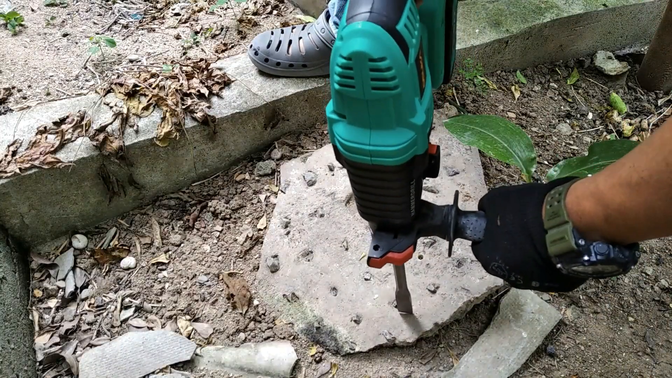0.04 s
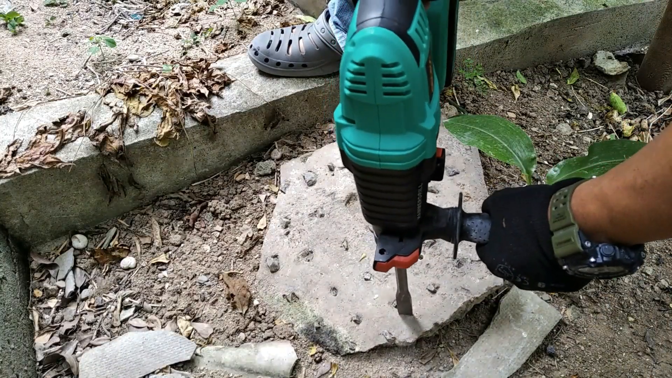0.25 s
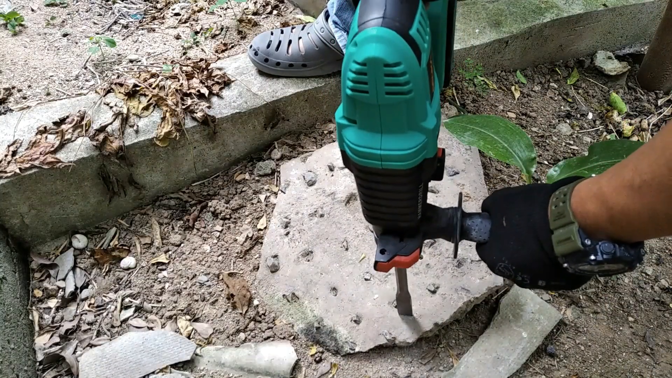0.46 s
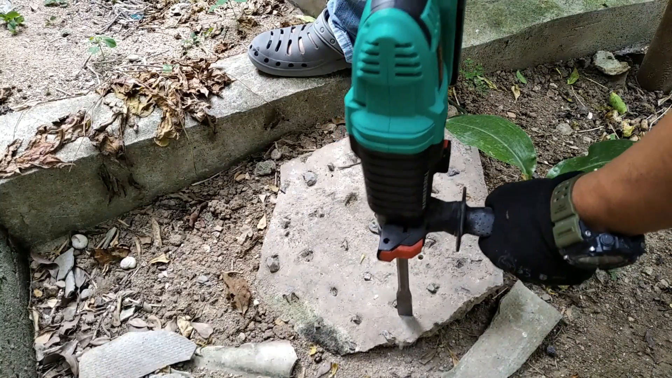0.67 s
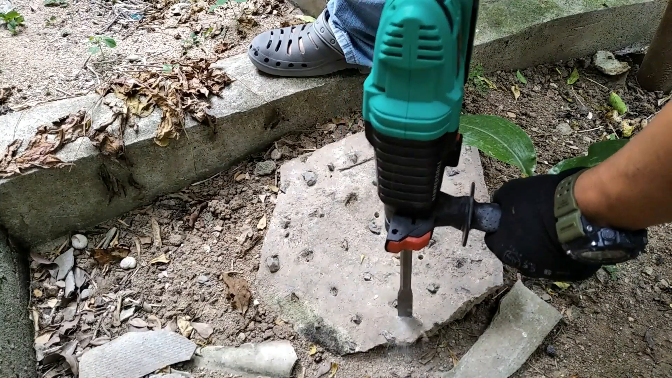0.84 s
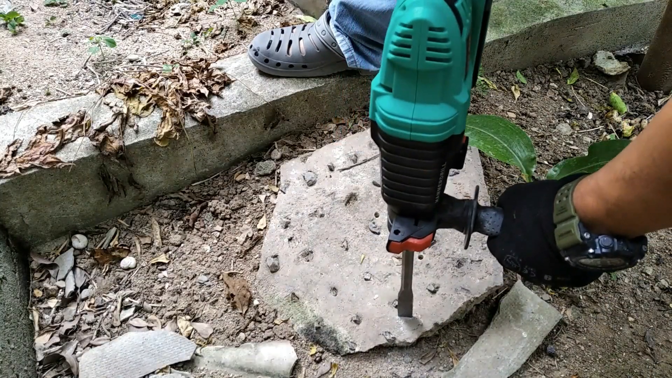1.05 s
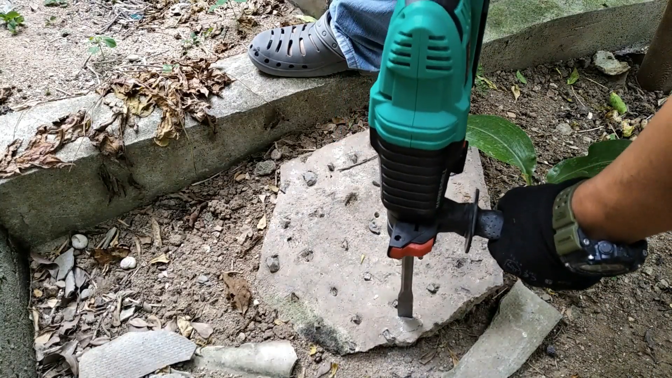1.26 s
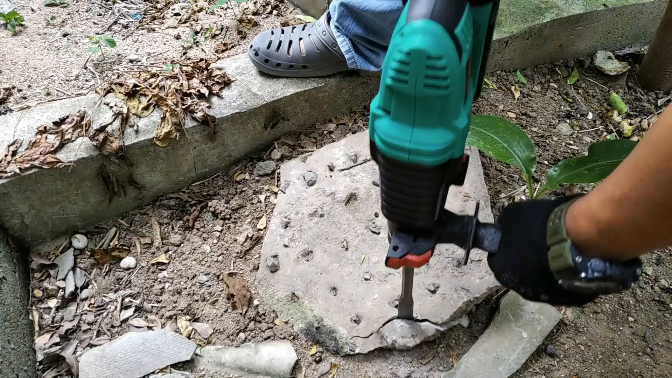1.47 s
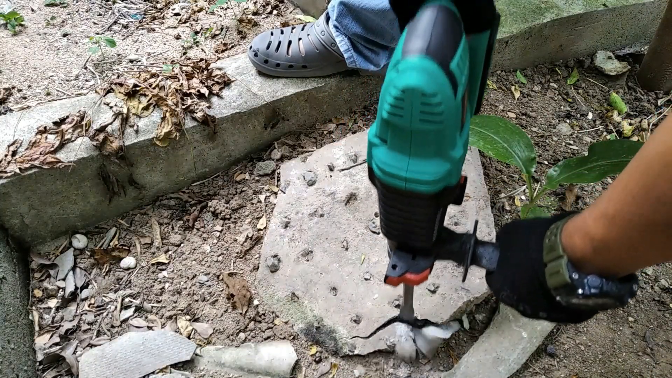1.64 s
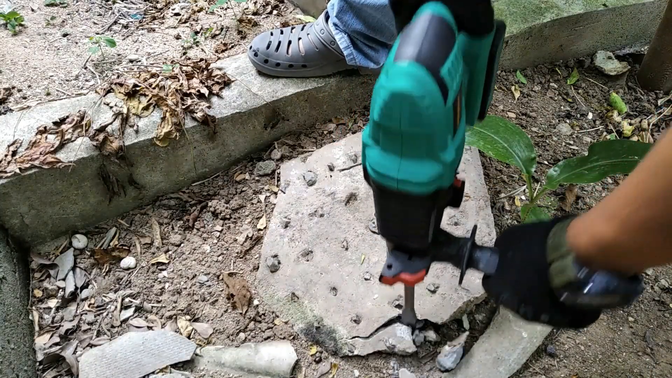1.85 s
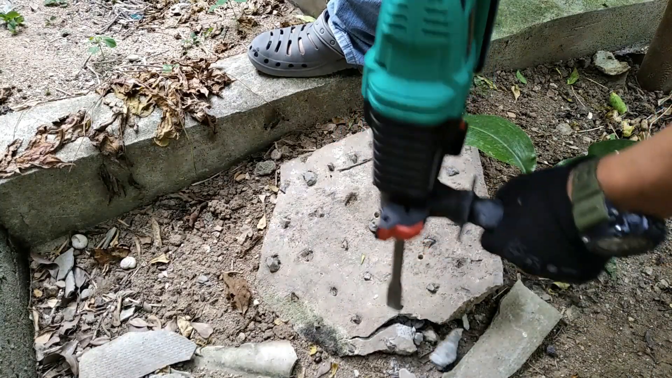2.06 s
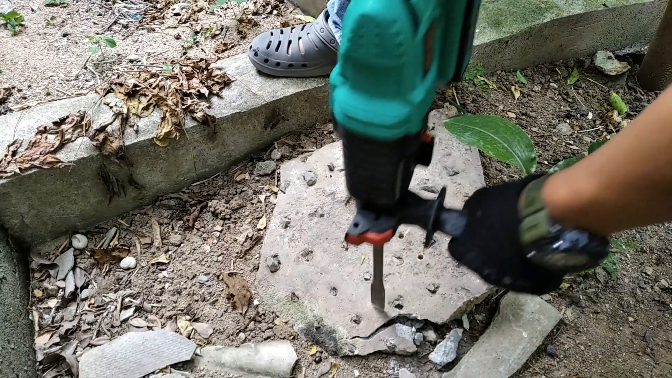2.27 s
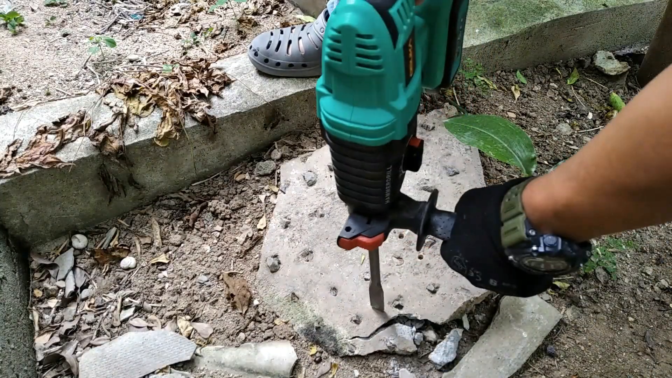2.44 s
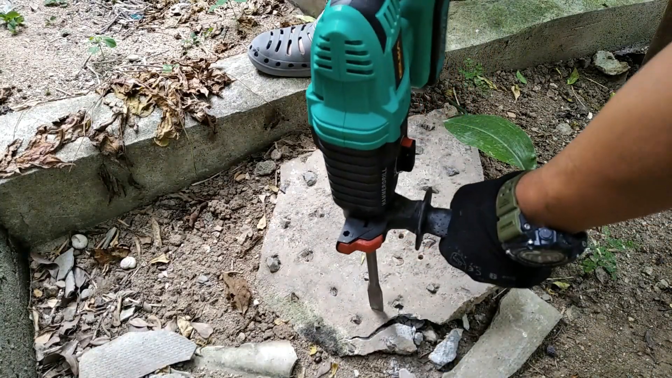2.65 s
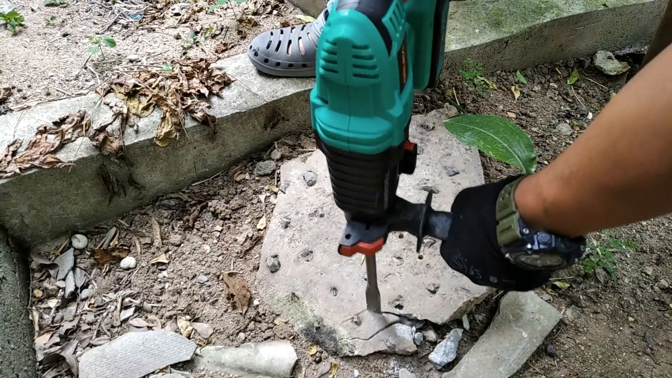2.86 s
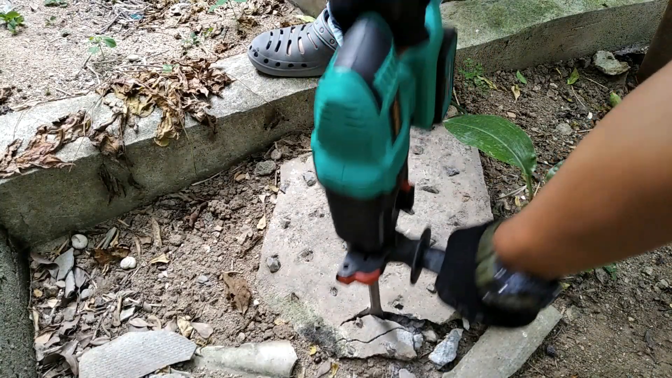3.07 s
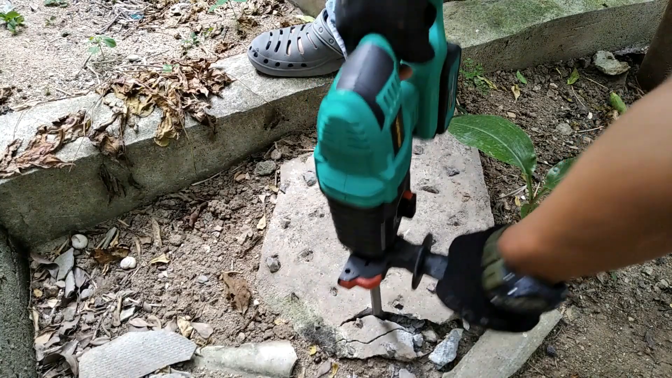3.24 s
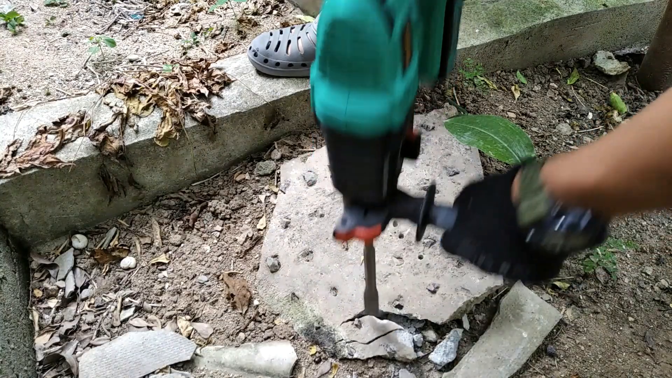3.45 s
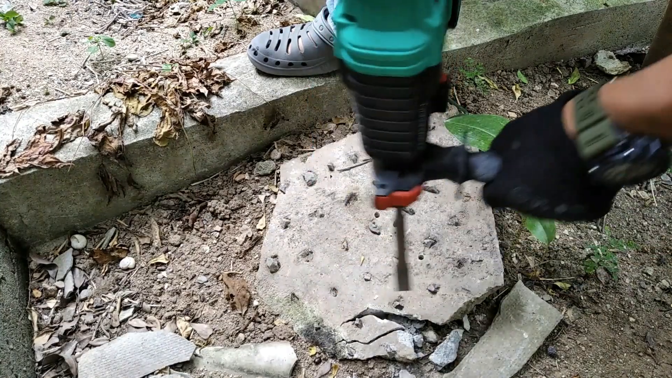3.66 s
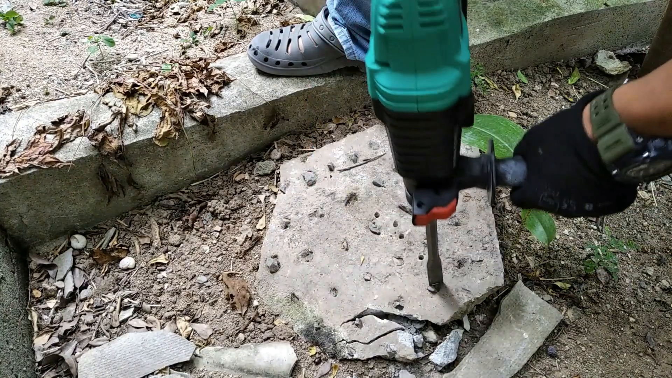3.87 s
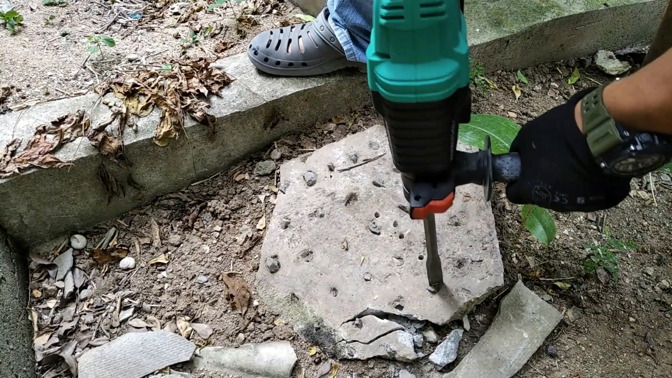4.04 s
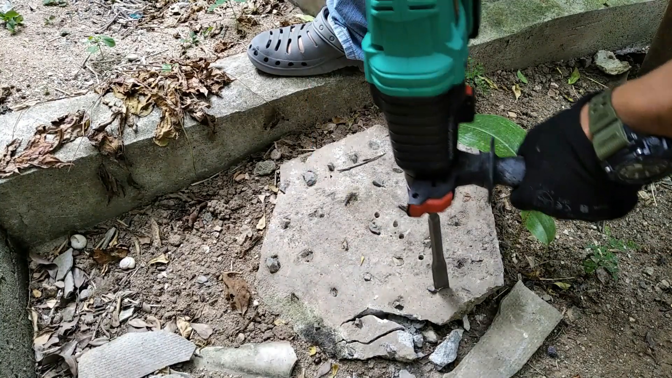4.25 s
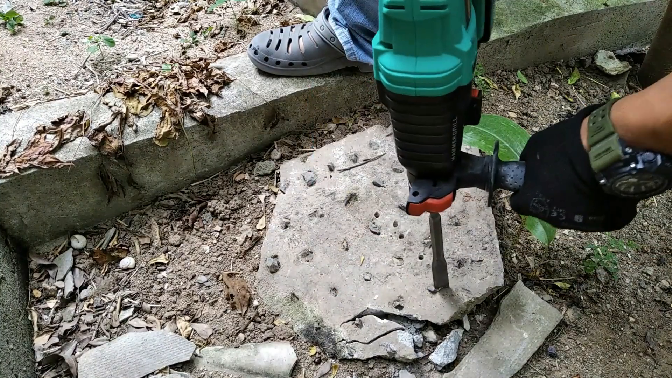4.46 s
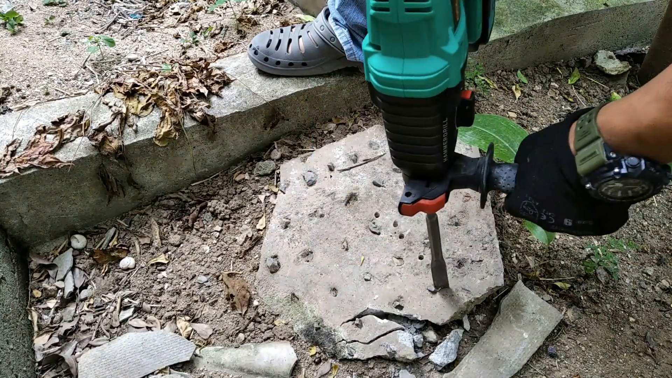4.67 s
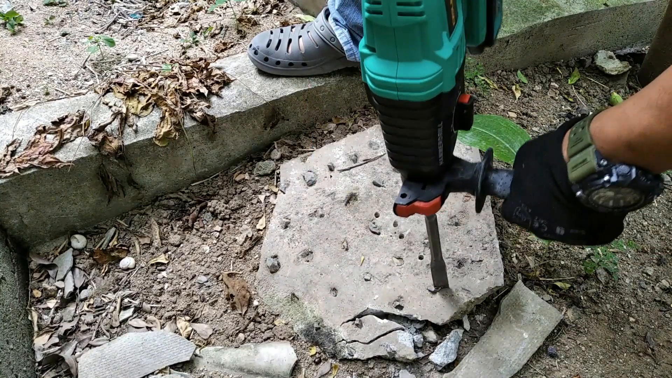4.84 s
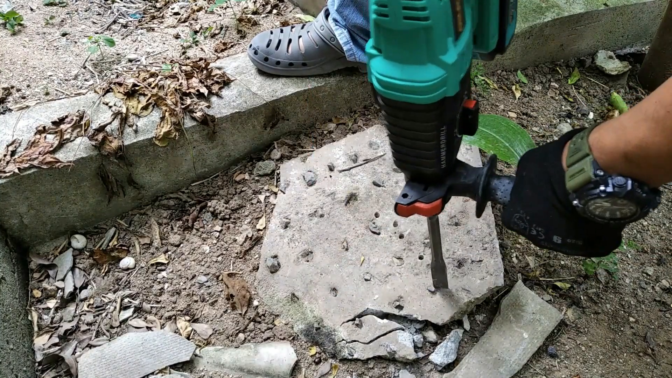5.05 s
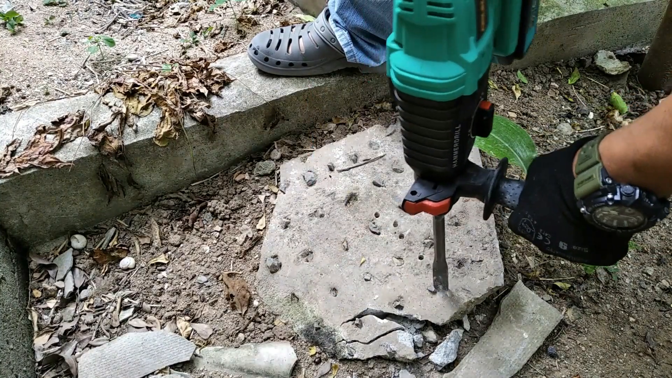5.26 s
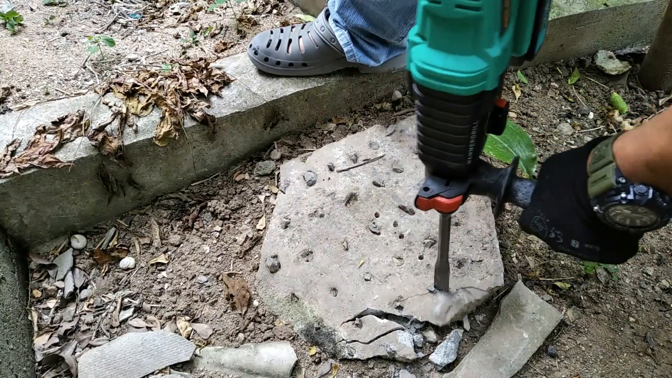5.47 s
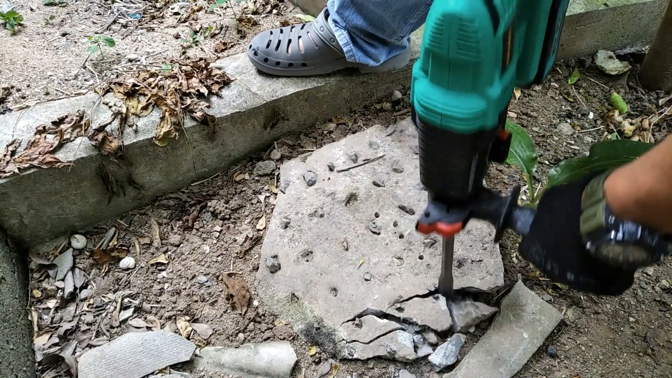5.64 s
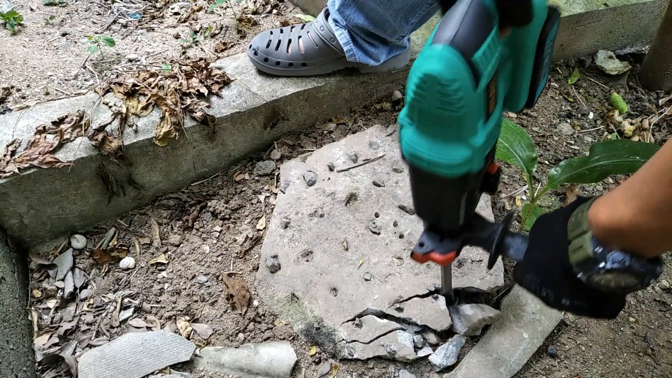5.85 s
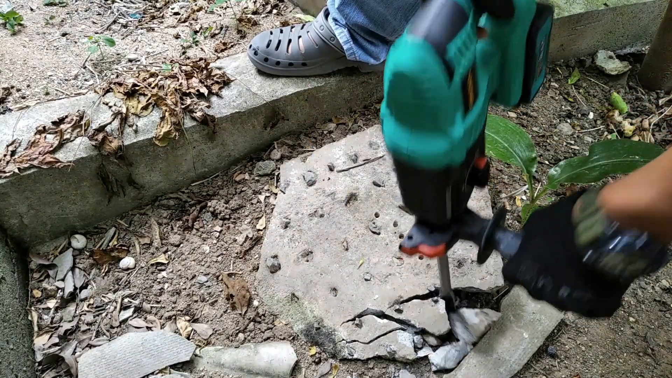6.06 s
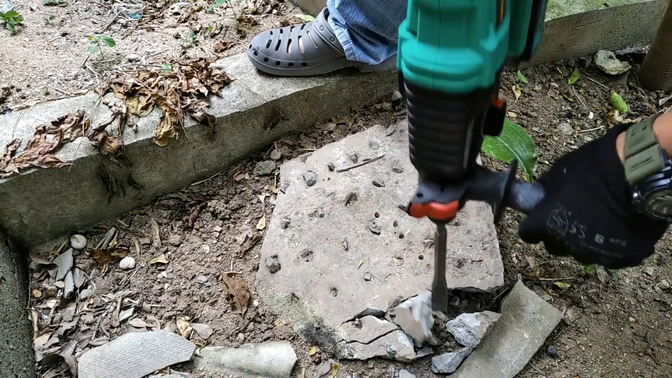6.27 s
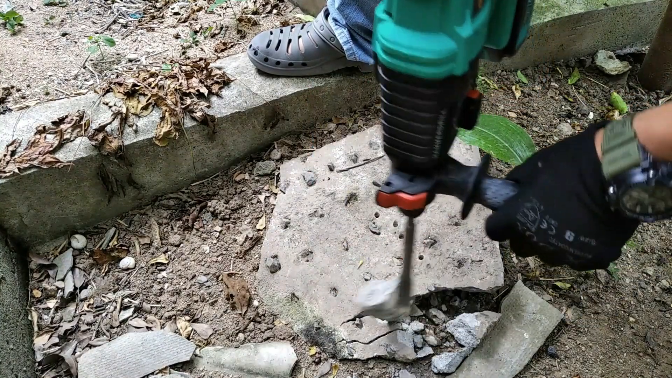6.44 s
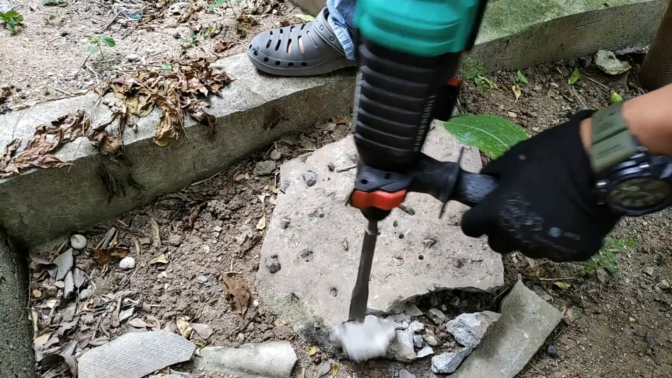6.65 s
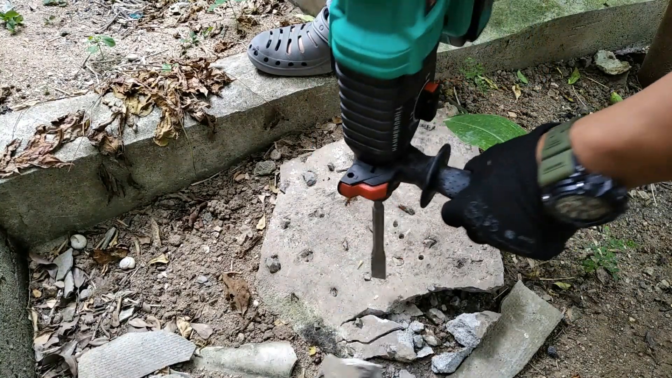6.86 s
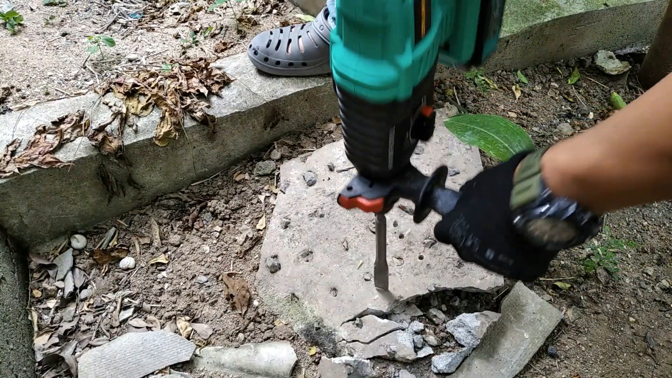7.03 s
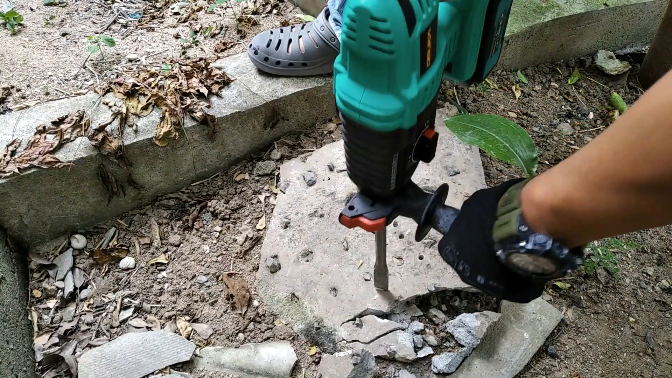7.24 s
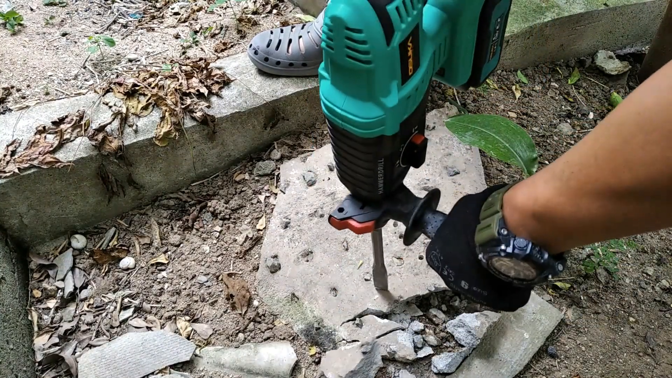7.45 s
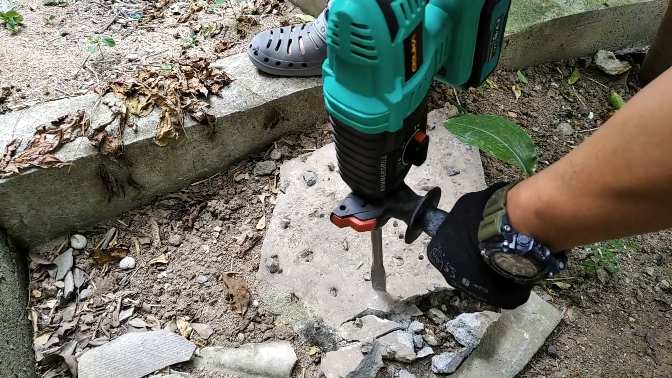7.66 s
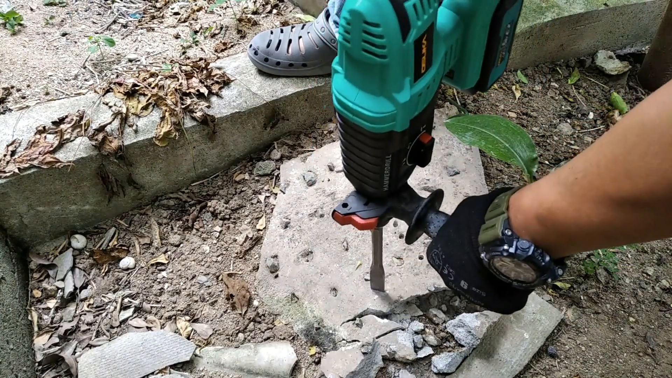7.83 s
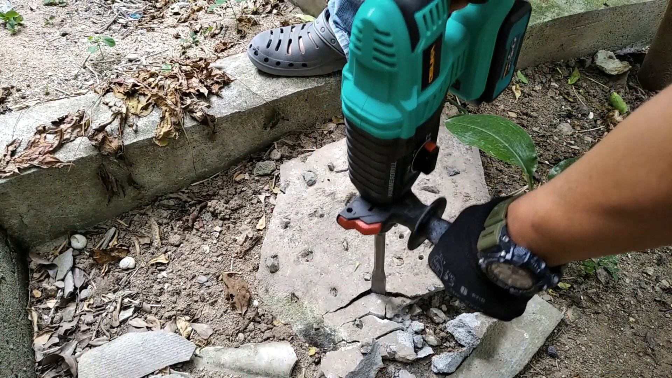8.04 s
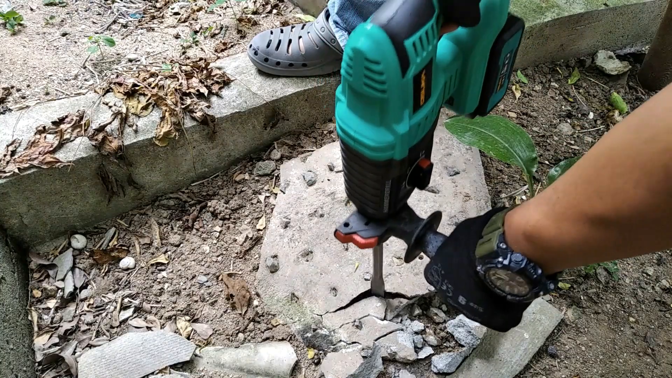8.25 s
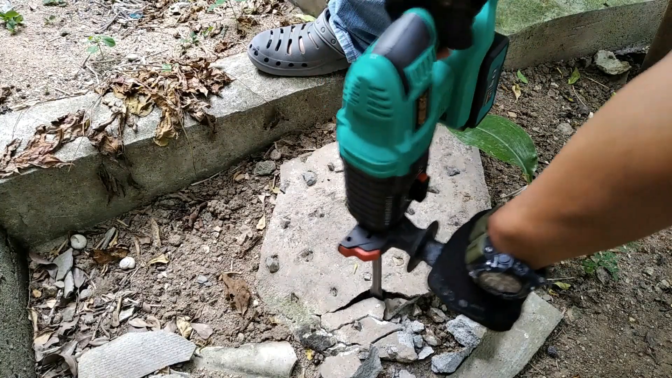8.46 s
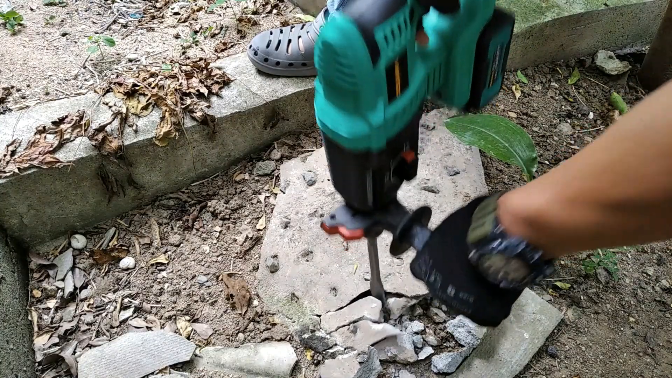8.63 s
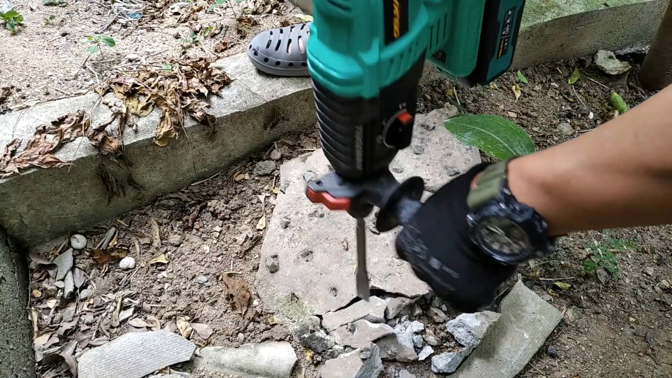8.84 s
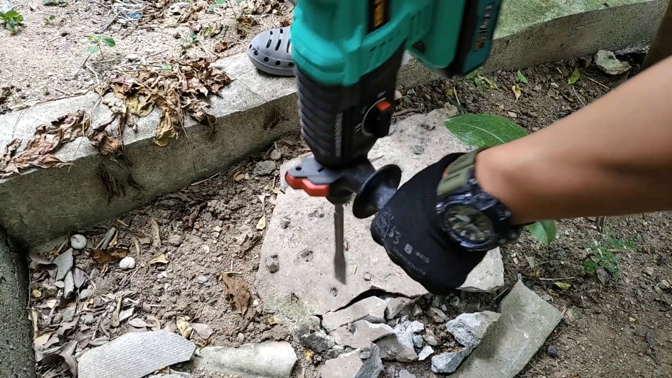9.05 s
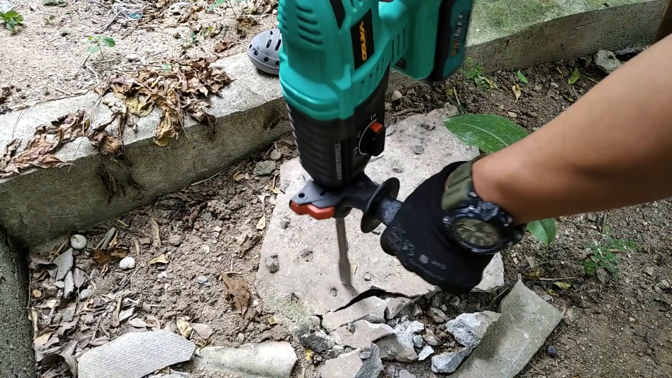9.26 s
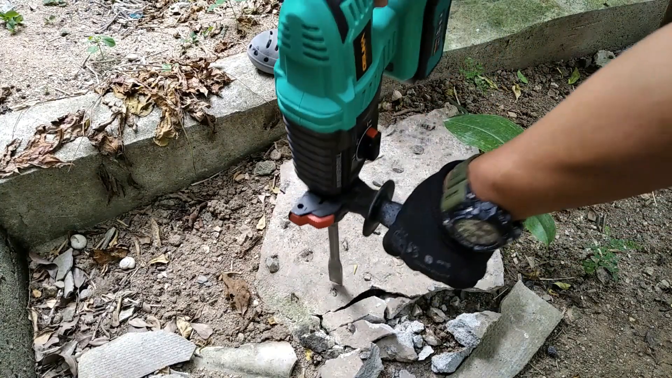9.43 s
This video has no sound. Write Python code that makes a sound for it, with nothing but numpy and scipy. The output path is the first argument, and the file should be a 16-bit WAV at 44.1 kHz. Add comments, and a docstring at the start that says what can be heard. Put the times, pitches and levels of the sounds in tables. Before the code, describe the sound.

A quiet outdoor floor, then a switch click at 0.07 s. A cordless rotary hammer spins up, its blows on concrete quickening from a separate knocking to a dense rattle by 1 s. It sags to slow beats around 1.2 s, revs again to full speed near 1.6 s, and winds down by 2.4 s with ringing chisel clangs. Stony knocks and a scrape follow at 2.5 s. The second burst, 2.7 to 3.9 s, is rough, with hard metallic clangs around 3.2 s. Knocks and light scraping fill 3.8 to 4.5 s. The third burst, 4.7 to 6.4 s, runs fast, gritty and bright, with gear grind, fan hiss and whine. Rubble ticks and knocks scatter until 7.5 s. The fourth burst, 7.55 to 9.2 s, hammers steadily, slows and stops; a few small knocks end it near 9.4 s. Close, dry, wide stereo.

```python
"""Outdoors in a quiet garden: a cordless rotary hammer chisels a concrete slab in four bursts,
heard by a close pair of microphone ports.
A crank drives one blow a turn: the steel chisel cracks and rings, the slab answers in damped modes.
Gears grind and loose parts rattle as shaped noise, the fan hisses, the motor whines in gliding tones.
Between bursts the chisel knocks and scrapes on rubble over the garden floor and faint far tones."""
import sys
import numpy as np
from scipy import signal
from scipy.fft import rfft, irfft
from scipy.io import wavfile
from scipy.ndimage import uniform_filter1d

SR = 44100
rng = np.random.default_rng(int(sys.argv[2]) if len(sys.argv) > 2 else 0)


def transcribe(u):
    """Save the signal u as a 16-bit wav file named by the first command-line argument.

    u: samples, shape (n,) or (channels, n), limited to [-1, 1]; the rate is SR.
    q: integer samples, one column per channel.
    """
    v = np.clip(np.atleast_2d(u).T, -1, 1)
    q = np.round(v * 32767).astype(np.int16)
    wavfile.write(sys.argv[1], SR, q)


N = 418950
HZ = np.maximum(np.arange(N // 2 + 1) * SR / N, 1)      # frequency of every bin

# crank speed, one table a burst from the trigger on: t/s, speed/blows per s
CRANK_SPEED = [
    [(0.068, 0.0), (0.085, 13), (0.19, 18), (0.27, 26.5), (0.335, 34.08), (0.79, 33.96), (0.86, 40.03),
     (0.95, 53.1), (1.04, 58.34), (1.11, 52.81), (1.15, 31.81), (1.2, 9.08), (1.28, 11.77), (1.34, 23.37),
     (1.41, 32.24), (1.5, 46.24), (1.6, 56.71), (1.91, 59.25), (1.96, 31.41), (2.02, 14.39), (2.1, 14.42),
     (2.2, 10.32), (2.45, 0.0)],
    [(2.71, 0.0), (2.72, 13.59), (2.83, 25.57), (2.95, 43.9), (3.04, 55.25), (3.25, 60.22), (3.44, 55.53),
     (3.5, 26.8), (3.6, 12.31), (3.9, 0.0)],
    [(4.685, 0.0), (4.7, 11.38), (4.81, 24.17), (4.9, 39.55), (4.97, 52.95), (5.03, 59.84), (5.1, 62.56),
     (5.18, 60.02), (5.27, 62.01), (5.45, 58.83), (5.65, 58.87), (5.9, 61.0), (6.06, 62.35), (6.18, 38.67),
     (6.23, 38.04), (6.29, 33.15), (6.4, 0.0)],
    [(7.553, 0.0), (7.58, 14.32), (7.68, 26.26), (7.8, 44.69), (7.9, 56.47), (8.05, 57.88), (8.55, 60.54),
     (8.68, 59.25), (8.73, 31.35), (8.8, 25.87), (8.92, 14.5), (9.3, 0.0)],
]
# modes of the chisel steel: f/Hz, relative level/dB, t60/s
CHISEL_MODES = [(10520, -14, .011), (13300, -10, .008), (13620, -4, .012), (13760, -3, .014),
                (13980, -2, .01), (14220, -4, .008)]
# colour of gears and grit: f/Hz, relative level/dB
GRIND_COLOUR = [(35, -39), (60, -33.5), (113, -27), (150, -17), (295, -12.5), (382, -13.5), (617, -10),
                (738, 3), (1700, 4.5), (2250, 3), (3930, 0.5), (5190, -18), (7000, -24.5), (9100, -68),
                (15400, -120)]
# colour of the hiss, also used for sharp cracks: f/Hz, relative level/dB
HISS_COLOUR = [(2650, -54.5), (4500, 0.5), (5530, -8), (8160, 10), (11100, 9), (12200, 3.5), (13200, 3.5),
               (14300, -10), (14700, -37.5), (15100, -71.5), (15500, -84)]
# where the casing radiates the whine: f/Hz, width/Hz, level/dB
CASING_PEAKS = [(2480, 400, 3), (3250, 650, -10), (1500, 800, -9)]


def amp(db):
    """Level in dB to amplitude."""
    return 10 ** (np.asarray(db) / 20)


def rms_one(x):
    """Scale to rms 1."""
    return x / np.sqrt(np.mean(x ** 2) + 1e-20)


def at_hz(points):
    """A spectrum table read at every bin, along log frequency."""
    hz, value = np.transpose(points)
    return np.interp(np.log(HZ), np.log(np.maximum(hz, 1)), value)


def in_time(tables, outside):
    """Columns of several tables along the time line, with one value outside them."""
    out = np.full((len(tables[0][0]) - 1, N), float(outside))
    for rows in tables:
        s, *columns = np.transpose(rows)
        at = np.arange(int(s[0] * SR), min(int(s[-1] * SR), N))
        out[:, at] = [np.interp(at / SR, s, c) for c in columns]
    return out


def drift(rate_hz):
    """Slow chance of spread 1."""
    low_pass = (HZ > 1) / (1 + (HZ / rate_hz) ** 2)
    return rms_one(irfft(rfft(rng.standard_normal(N)) * low_pass, N))


def band(x, low_hz, high_hz):
    """Band-pass filter."""
    return signal.sosfilt(signal.butter(2, [low_hz, high_hz], "band", fs=SR, output="sos"), x)


def ring(clicks, hz, t60):
    """A damped resonator: a unit click sets a sine of height 1 ringing."""
    r, w = amp(-60 / (t60 * SR)), 2 * np.pi * hz / SR
    return signal.lfilter([0, np.sin(w)], [1, -2 * r * np.cos(w), r * r], clicks + 1e-18)


def swell(clicks, hz, t60):
    """Driven through a soft contact, the ring first grows and then dies; top near 1."""
    return ring(ring(clicks, hz, t60), hz, t60) * 2 * np.e * np.log(1000) / (t60 * SR)


def strike(at, gains, modes, spread_db, late_s=0., sound=ring):
    """Every blow hits every mode with a strength and a small delay of its own."""
    out, luck = np.zeros(N), rng.standard_normal((len(at), 2 * len(modes)))
    for k, (hz, level_db, t60) in enumerate(modes):
        late = (np.abs(luck[:, -k - 1]) * late_s * SR).astype(int)
        clicks = np.zeros(N)
        clicks[at + late] = gains * amp(level_db + spread_db * luck[:, k])
        out += sound(clicks, hz, t60) * (-1) ** k
    return out


def puffs(at, gains, decay_s, rise_s=0.00075):
    """Envelope that rises at each contact and dies."""
    clicks, r = np.zeros(N), np.exp(-1 / (rise_s * SR))
    clicks[at] = gains
    poles = np.convolve([1, -r], [1, -np.exp(-1 / (decay_s * SR))])
    return signal.lfilter([1 - r], poles, clicks + 1e-18)


def ports(x):
    """A near sound reaches the two microphone ports with different colour and phase."""
    # left above right: f/Hz, level/dB
    port_db = [(60, 1.5), (110, 5.5), (200, 0.5), (380, 5.5), (700, -1), (1290, -4.5), (2380, 0.5),
               (4400, -1.5), (8120, -3.5), (15000, 12.5)]
    # left ahead of right: f/Hz, phase/rad
    port_lead = [(0, -3.5), (430, 1.04), (1120, 0.5), (1720, -5.5), (2410, -6), (4740, -5), (5600, 0.5),
                 (7750, -2.5), (8440, 5), (9470, 5), (12300, -16), (13100, -15), (14600, -23), (15200, -27)]
    half = amp(at_hz(port_db) / 2) * np.exp(.5j * at_hz(port_lead))
    return irfft(rfft(x) * np.array([half, 1 / half]), N)


def wide_noise(spectrum):
    """Coloured noise of rms 1, partly shared by the ports, partly each one's own."""
    # power heard by both ports: f/Hz, share/0-1
    likeness = [(60, 1), (300, 0.82), (1000, 0.21), (3000, 0.027), (8000, 0.85), (14000, 0.16)]
    alike, colour = np.clip(at_hz(likeness), 0, 1), amp(at_hz(spectrum))
    shared = rfft(ports(rng.standard_normal(N)))
    own = rfft(rng.standard_normal((2, N)))
    return rms_one(irfft(colour * (np.sqrt(alike) * shared + np.sqrt(1 - alike) * own), N))


def garden():
    """Steady outdoor floor of noise, a faint narrow buzz that comes and goes, and far tones."""
    # colour of the floor: f/Hz, relative level/dB
    floor_colour = [(12, -47), (20, -35.5), (98, -10.5), (140, -5.5), (202, -11.5), (534, -13), (614, -8),
                    (985, -16), (3350, -28), (3960, -23.5), (4550, -34.5), (4950, -39.5), (6720, -34),
                    (14300, -29), (15500, -64)]
    # buzz, one table an appearance: t/s, level/dB
    buzz_level = [
        [(3.9, -81), (4.026, -47), (4.162, -49), (4.356, -61.5), (4.488, -73), (4.62, -68.5)],
        [(6.85, -86.5), (7.0, -58), (7.144, -57.5), (7.5, -53)],
        [(9.3, -90.5), (9.5, -39.5)],
    ]
    # faint wavering tones from afar: start t/s, end t/s, f/Hz, level/dB
    far_tones = [(0, 9.5, 70, -64), (0, 9.5, 118, -62), (2.33, 2.75, 380, -58), (2.45, 2.78, 445, -53),
                 (2.5, 2.75, 320, -65)]
    floor_db, buzz_hz, buzz_width_hz = -53, 780, 70
    t = np.arange(N) / SR
    buzz = band(rng.standard_normal(N), buzz_hz - buzz_width_hz / 2, buzz_hz + buzz_width_hz / 2)
    far = amp(in_time(buzz_level, -120)[0]) * rms_one(buzz)
    for start, end, hz, db in far_tones:
        fade = np.clip(np.minimum(t - start, end - t) / 0.055, 0, 1)
        tone = np.sin(2 * np.pi * hz * t + .6 * drift(4))
        far += fade * amp(db + 2.0 * drift(5)) * tone
    return amp(floor_db + 0.48 * drift(4)) * wide_noise(floor_colour) + ports(far)


def trigger():
    """The switch ticks and snaps in quick succession, then gears take up slack and ring the casing."""
    # switch pulls: t/s, level/dB
    pulls = [(0.066, -19), (2.708, -16.5), (4.684, -16.5), (7.552, -17.5)]
    # modes of the switch: f/Hz, relative level/dB, t60/s
    switch_modes = [(2480, 0.5, 0.018), (3170, 3, 0.0054), (3350, 8, 0.0095), (3680, 1, 0.006)]
    # slack: level re the pull, decay, ring of the casing
    take_up_db, take_up_s, take_up_t60_s = -10, 0.19, 0.0087
    s, db = np.transpose(pulls)
    snaps = [(-.0012, -24.5), (.0012, -4.5), (.0038, -11.5), (.0068, -11)]      # delay/s, level/dB
    hits = [(((s + delay) * SR).astype(int), amp(db + gain_db)) for delay, gain_db in snaps]
    rings = sum(strike(at, gains, switch_modes, 2.0, .0003, swell) for at, gains in hits)
    slack = rms_one(ring(rng.standard_normal(N), CASING_PEAKS[0][0], take_up_t60_s))
    rings += slack * puffs(hits[-1][0], amp(db + take_up_db), decay_s=take_up_s, rise_s=0.016)
    hissing = sum(puffs(at, gains * amp(-3.0), decay_s=0.0023) for at, gains in hits)
    return ports(rings) + hissing * wide_noise(HISS_COLOUR)


def crank():
    """Crank speed (blows per s), turns done, and the sample of each full turn."""
    # part of a turn already done at each trigger pull, one a burst: turn/0-1
    crank_start = [.315, .4, .331, .63]
    speed = in_time(CRANK_SPEED, 0)[0]
    turns = np.cumsum(speed) / SR
    for rows, done in zip(CRANK_SPEED, crank_start):      # the count starts anew at every pull
        first = int(rows[0][0] * SR)
        turns[first:] += done - turns[first]
    return speed, turns, np.flatnonzero(np.diff(np.floor(turns)) > 0)


def bites():
    """How far the tip has bitten (0-1), how early blows land (s), and the gains of firm concrete."""
    # tip in firm concrete: start t/s, end t/s, blows early/ms,
    # then relative levels: nine slab modes/dB, chisel crack/dB, damped ring/dB
    bite_rows = [(0.109, 0.3, 1, -48, -36, -25, -21, -26.5, -22.5, -38, -50.5, -27, -35, -45),
                 (0.296, 0.494, 2.5, -37, -34, -25, -23, -21, -27, -34, -38, -20.5, -28, -31.5),
                 (0.494, 0.913, 1.5, -41, -33, -26.5, -22, -18, -19.5, -22.5, -28.5, -18.5, -28, -36.5),
                 (0.907, 1.163, 0, -40, -39.5, -20.5, -18.5, -14.5, -17.5, -29, -22.5, -23.5, -27.5, -31.5),
                 (1.236, 1.564, 0, -47, -36, -25, -22, -16.5, -19.5, -25.5, -23, -22.5, -29, -37),
                 (2.757, 3.101, -0.5, -36.5, -35.5, -20, -19.5, -21.5, -25, -21.5, -31.5, -23.5, -27.5, -29),
                 (4.714, 4.748, 4.5, -59.5, -43.5, -36.5, -25, -28.5, -33, -36.5, -29.5, -30.5, -46, -50),
                 (4.88, 5.147, 2.5, -55.5, -37, -46, -23, -14.5, -29, -26.5, -41.5, -14.5, -29, -56),
                 (5.133, 5.26, 1.5, -40, -33, -28, -18, -20, -19, -23, -34.5, -29, -47, -33),
                 (5.268, 5.694, 0.5, -42.5, -30, -24, -21, -13.5, -17, -17.5, -38, -20.5, -29.5, -32),
                 (6.115, 6.22, 1, -48, -33.5, -31, -27, -29, -40, -39, -40, -29.5, -41, -48.5),
                 (6.235, 6.283, 1, -41.5, -41.5, -26, -19, -21, -38.5, -36, -30.5, -38, -31.5, -47),
                 (7.6, 7.715, -0.5, -40, -40, -23, -24.5, -37.5, -48, -32.5, -29.5, -31, -33, -36),
                 (7.732, 8.126, 0.5, -38.5, -28, -19.5, -22, -18.5, -24, -16.5, -29, -23, -25.5, -32)]
    edge_s = 0.056
    rows, t = np.array(bite_rows), np.arange(N) / SR
    shapes = np.clip(np.minimum(t - rows[:, :1], rows[:, 1:2] - t) / edge_s + .5, 0, 1)
    share = shapes.sum(axis=0)
    early_s = rows[:, 2] @ shapes / (share + 1e-9) / 1000
    return np.minimum(share, 1), early_s, amp(rows[:, 3:]).T @ shapes


def per_burst():
    """Free ring, shaking and lead of the whine (samples) along the time line."""
    # free tool, one table a burst: t/s, relative ring of the steel/dB, relative shaking of the body/dB
    ring_level = [
        [(.07, -27.5, 4), (1.0, -28, 8.5), (1.5, -26.5, -4), (1.65, -19, 0.5), (1.9, -23.5, -3),
         (2.45, -19, -3)],
        [(2.71, -24, 2), (3.2, -19, -8), (3.4, -27, -0.5), (3.9, -27, 1)],
        [(4.69, -28.5, -13.5), (5.3, -32, -2), (5.7, -19, -2), (6.0, -28, -4), (6.4, -23, 2.5)],
        [(7.56, -29, -3), (8.05, -28, -4.5), (8.2, -25, 4), (8.45, -30, 3.5), (8.6, -23, -0.5),
         (8.75, -26, -10), (9.3, -40, -3)],
    ]
    # the whine starts ahead of the crank, one value a burst: lead/ms
    whine_lead = [62, 0, 43, 8]
    fades_s = .21      # by then it has fallen into step
    leads = [[(rows[0][0], ms), (rows[0][0] + fades_s, 0)] for rows, ms in zip(CRANK_SPEED, whine_lead)]
    lead_ms, = in_time(leads, 0)
    ringing, shaking = amp(in_time(ring_level, -120))
    return ringing, shaking, lead_ms * SR / 1000


def slab_blows(at, firm, rubble, apart):
    """Each blow sets the damped modes of the slab swelling; rubble answers with its own balance."""
    # modes of the slab: f/Hz, t60/s
    slab_modes = [(250, 0.024), (530, 0.0091), (794.6, 0.013), (1048, 0.0077), (1535, 0.0054),
                  (1986, 0.0078), (2246, 0.0086), (2780, .007), (3300, 0.0032)]
    # the same nine modes under blows into broken rubble: relative level/dB
    loose_db = [-54.5, -41.5, -30, -41, -46, -56, -40, -31, -19.5]
    levels = firm[:-2, at] + rubble[at] * amp(loose_db)[:, None]
    return sum((-1) ** k * strike(at, 1.8 * level * apart, [(hz, 0, t60)], 1.0, .00003, swell)
               for k, (level, (hz, t60)) in enumerate(zip(levels, slab_modes)))


def chisel_blows(at, steel, apart, free):
    """The struck steel rings at its modes, one draw for each port, damped where the slab holds it."""
    damped = [(hz, db + 7.0, 0.5 * t60) for hz, db, t60 in CHISEL_MODES]
    # the free steel rings briefly at each blow
    brief = [(hz, db + 1, 0.6 * t60) for hz, db, t60 in CHISEL_MODES]
    struck = 2.8 * steel[at] * apart * amp(2.4 * rng.standard_normal(len(at)))
    loose, held = struck * free[at], struck * (1 - free[at])
    chisel = np.array([strike(at, loose, brief, 3.5, .0005, swell) + strike(at - 30, held, damped, 3.5, .0008)
                       for port in range(2)])
    chisel += 0.24 * chisel[::-1]      # the ports share part of the ring
    return chisel * amp([[1.5], [-1.5]])


def chisel_cracks(at, firm, unheld, force):
    """Short bursts of bright noise at each blow, softer in onset on firm concrete."""
    loose_crack = unheld * amp(-20.5)
    on_firm = puffs(at - int(0.0022 * SR), 4.4 * firm[-2, at] * force, decay_s=0.0026, rise_s=0.0014)
    on_rubble = puffs(at - int(.0004 * SR), 4 * loose_crack[at] * force, decay_s=0.0026, rise_s=0.0003)
    return (on_firm + on_rubble) * wide_noise(HISS_COLOUR)


def gears(at, luck, turns, pace, free):
    """Grinding noise whose load swings with the crank, with the free chisel clattering in its chuck."""
    # swing with each turn, what a slow crank adds to it (dB), turns ahead of the crank's full turn
    stroke_db, slow_stroke_db, stroke_lead = 1.0, 4.5, 0.05
    slow_clatter = 1.3      # what a slow crank adds to the clatter
    stroke = np.cos(2 * np.pi * (turns + stroke_lead))
    swing_db = (stroke_db + slow_stroke_db * free * (0.5 - pace)) * stroke
    rough = amp(1.3 * drift(140) + 1.6 * drift(17) + swing_db)
    loose = np.flatnonzero(rng.random(N - 1) < 120.0 / SR)      # contacts at random times
    clatter = puffs(loose, amp(5.0 * rng.standard_normal(len(loose))), decay_s=0.0015)
    clatter += puffs(at - 20, 9 * luck, decay_s=0.001, rise_s=.0002)
    chuck = 0.14 * (1 + slow_clatter * (1 - pace)) * free * clatter
    return (rough * (1 - 0.23 * free) + chuck) * wide_noise(GRIND_COLOUR)


def rattles(pace):
    """Loose parts touch densely at random, harder with crank speed; each part comes and goes on its own."""
    # loose parts of the tool: f/Hz, relative level/dB, t60/s
    loose_parts = [(760, 0, .007), (1080, 0, .006), (1420, -2, .006), (1850, -1, .005), (2300, 1, .005),
                   (2850, -1, .0045), (3450, -3, .004)]
    contacts_per_s, level_db, shift_db = 2500, -5, 3.0      # level before pace; how far each part swells and fades
    touch = rng.random(N) < contacts_per_s / SR
    heights = amp(2.5 * np.minimum(rng.exponential(1, N), 3))
    sizes = touch * heights * rng.choice([-1, 1], N)
    dealt = rng.integers(0, len(loose_parts), N)
    parts = sum(amp(db + shift_db * drift(5)) * swell(sizes * (dealt == k), hz, t60)
                for k, (hz, db, t60) in enumerate(loose_parts))
    return pace * amp(level_db) * rms_one(parts)


def fan(grind_db, free):
    """Fan hiss that follows the grind, with the running tool keeping the chisel singing."""
    hiss_db, follows = -25.5, 1.43      # hiss when the grind is at -20.5 dB; dB of hiss per dB of grind
    sing_hz, sing_t60_s, sing_db = 13850, .0018, -8
    hiss = amp(hiss_db + follows * (grind_db + 20.5)) * amp(0.6 * drift(200) + 2.14 * drift(14.0))
    singing = rms_one(ring(rng.standard_normal((2, N)), sing_hz, sing_t60_s))
    return hiss * (wide_noise(HISS_COLOUR) + amp(sing_db) * (.4 + free) * singing)


def casing(hz, strain):
    """Gain with which the casing radiates a gliding tone, read every 32 samples."""
    strain_spread = 1.6      # how much a motor under drive lifts the weaker resonances
    main, *weak = [amp(db) / (1 + ((hz[::32] - peak_hz) / width_hz * 2) ** 2)
                   for peak_hz, width_hz, db in CASING_PEAKS]
    return np.repeat(main + sum(weak) * (1 + strain_spread * strain[::32]), 32)[:N]


def whine(speed, level):
    """Tones of the motor series, each loud while it passes a casing resonance."""
    # multiples of the motor's base pitch: multiple, relative level/dB
    motor_tones = [(2, 0), (3, -7), (4, -1), (5, 1), (6, -1), (7, -3), (8, -5), (9, -5), (10, -7)]
    gear_ratio = 18.85      # base pitch in Hz per blow a second
    spin_up_per_s2 = 590    # gain of crank speed (blows per s per s) that doubles the drive
    hz = gear_ratio * speed
    gain = uniform_filter1d(np.gradient(speed) * SR, size=900)
    phase = 2 * np.pi * np.cumsum(hz) / SR + .08 * drift(60)
    strain = np.maximum(gain, 0) / spin_up_per_s2
    # a motor losing speed fast has no drive
    drive = (1 + strain) / (1 + (np.minimum(gain, 0) / 100) ** 2)
    tones = sum(amp(db) * np.sin(k * phase) * casing(k * hz, strain) for k, db in motor_tones)
    return level * drive * amp(2.2 * drift(12) + 1.3 * drift(90)) * tones


def body_shake(speed, turns):
    """Multiples of the crank turn shake the tool body; unbalance shakes hard only near 60 turns per s."""
    # multiples of the crank turn: multiple, relative level/dB
    shake_tones = [(2, -26), (3, -28), (4, -32), (5, -25), (7, -31.5), (9, -29)]
    tones = sum(amp(1.5 * drift(3)) * amp(db) * np.sin(2 * np.pi * k * turns) for k, db in shake_tones)
    return tones * (speed / 60) ** 4


def hammer():
    """Blows at each full crank turn over grind, rattle, hiss and whine."""
    # running tool, one table a burst: t/s, gear grind level/dB, whine re the grind/dB
    grind_level = [
        [(.07, -33, -14.5), (.14, -27, -7), (.25, -22, -7.5), (.53, -27, -4.5), (.83, -28.5, -3.5),
         (1.04, -19.5, -10.5), (1.17, -28.5, -10.5), (1.19, -29.5, -8), (1.31, -26.5, -0.5), (1.49, -26, -13.5),
         (1.6, -19, -1.5), (1.91, -20.5, -12), (2.22, -32.5, -2), (2.45, -51, -1.5)],
        [(2.71, -42.5, -6), (2.76, -21.5, -4), (2.9, -26, -6.5), (3.0, -22, -20.5), (3.34, -18, -7.5),
         (3.49, -18.5, 4.5), (3.68, -27, -12.5), (3.8, -37, -11.5), (3.86, -51, -2)],
        [(4.69, -38, -22), (4.75, -23.5, -0.5), (4.86, -18.5, -3.5), (4.9, -18, -2.5), (4.96, -17.5, -11),
         (5.03, -18, -2), (5.17, -19, -4), (5.37, -23.5, -8.5), (5.7, -22, -8.5), (5.93, -19, -9.5),
         (6.16, -20.5, -10), (6.21, -17.5, -3), (6.28, -18, 2.5), (6.42, -52.5, -29)],
        [(7.56, -37.5, -11), (7.59, -25, -1), (7.72, -19, -8.5), (7.74, -26, -23.5), (7.9, -20, -11),
         (8.25, -20.5, -13), (8.4, -21.5, 0), (8.6, -20, -7), (8.69, -18.5, -1), (8.71, -20.5, -15.5),
         (8.82, -21, -17), (9.2, -43.5, 1), (9.3, -57, -11)],
    ]
    pace_reference_per_s = 71.5      # crank speed at which pace would be 1
    slab_power, steel_power = 2.5, 2      # loose blows weaken as the crank slows
    load_swing = 0.55      # share of the whine that swells towards each full turn
    speed, turns, at = crank()
    grind_db, whine_db = in_time(grind_level, -120)
    grind, pace = amp(grind_db), speed / pace_reference_per_s
    bitten, early_s, firm = bites()
    at -= (early_s[at] * SR).astype(int)
    ringing, shaking, lead = per_burst()
    rubble = (1 - bitten) * pace ** slab_power
    unheld = (1 - bitten) * pace ** steel_power
    # sparse blows carry more energy each for the same mean level
    apart = np.sqrt(60 / np.maximum(speed[at], 12))
    # firm concrete holds the tool still and damps the steel
    free = 1 / (1 + (1.5 * firm[4:7].sum(axis=0) / (grind + 1e-9)) ** 2)
    luck = amp(1.66 * rng.standard_normal(len(at)))
    motor = grind * amp(whine_db) * (1 - load_swing * np.sin(2 * np.pi * turns))
    led_speed = np.interp(np.arange(N) + lead, np.arange(N), speed)
    near = slab_blows(at, firm, rubble, apart) + whine(led_speed, motor)
    near += body_shake(speed, turns) * shaking * grind * (0.23 + free)
    near += grind * free * rattles(pace)
    steel = chisel_blows(at, firm[-1] + unheld * ringing, apart, free)
    steel += chisel_cracks(at, firm, unheld, apart * luck)
    return ports(near) + steel + grind * gears(at, luck, turns, pace, free) + fan(grind_db, free)


def clangs():
    """The free chisel clangs in its chuck: a crack, the ring of the steel and its slow tail."""
    # single strokes: t/s, level/dB
    strokes = [(2.0318, -10), (2.1011, -11), (2.1799, -19), (2.2952, -21), (3.142, -11), (3.224, -5),
               (3.231, -4), (3.239, -7), (3.2494, -7), (3.4471, -8), (3.6621, -30), (5.8626, -11),
               (6.0144, -11)]
    # slow modes of the free chisel: f/Hz, relative level/dB, t60/s
    slow_modes = [(10500, -24, .05), (13640, -17, .07), (13770, -14, .11), (13880, -15, .12),
                  (14050, -17, .08)]
    s, db = np.transpose(strokes)
    at = (s * SR).astype(int)
    rings = np.array([strike(at, amp(db - 3.0), CHISEL_MODES, 3.0, .0015, swell)
                      + strike(at, amp(db + 1), slow_modes, 2.5, .002) for port in range(2)])
    return rings + puffs(at, amp(db - 17.0), decay_s=0.0061) * wide_noise(HISS_COLOUR)


def knocks():
    """Each knock of chisel and stones: a short ring at its pitch, a gritty puff, a tick and ring of steel."""
    # knocks: t/s, relative level/dB, f/Hz, relative steel tick level/dB, left above right/dB (pitched ring)
    knock_rows = [(2.477, -32, 985, -48.5, -0.5), (2.51, -14, 930, -27, -5), (2.528, -22.5, 756, -42, 7),
                  (2.583, -35, 1870, -54, 1), (3.817, -18, 1940, -25, -1), (4.045, -17.5, 860, -22, 3),
                  (4.061, -26.5, 870, -46, -32), (4.093, -15.5, 1980, -32, 20), (4.109, -25, 750, -60, 13),
                  (4.498, -24, 800, -45, -25.5), (4.539, -44, 810, -61.5, 29), (6.378, -35, 2900, -36, -3),
                  (6.466, -27.5, 1550, -42, 2), (6.49, -23.5, 2600, -33, 1), (6.507, -26.5, 1540, -52, -1),
                  (6.528, -33, 1460, -42.5, 1.5), (6.656, -32, 840, -47.5, 1), (6.788, -27.5, 2300, -39, 0),
                  (6.805, -20.5, 1900, -35, 0), (6.934, -25.5, 1030, -23, -1.5),
                  (6.997, -34, 2570, -36, -1), (7.156, -30, 2950, -24, -2), (7.256, -18.5, 850, -33.5, 4),
                  (7.263, -15.5, 940, -25.5, -20), (7.457, -22, 640, -22.5, 5),
                  (7.469, -10.5, 1120, -35, 0), (9.373, -17, 825, -27, -24), (9.381, -21, 1030, -39, -30),
                  (9.468, -25.5, 774, -50, 14)]
    out = np.zeros((2, N))
    s, db, hz, tick_db, pan_db = np.transpose(knock_rows)
    at = (s * SR).astype(int)
    for i, level_db, pitch_hz, side_db in zip(at, db, hz, pan_db):
        click = np.zeros(2000)
        click[0] = amp(level_db - 6)
        panned = swell(click, pitch_hz, 9.0 / pitch_hz) * amp([[side_db / 2], [-side_db / 2]])
        out[:, i:i + 2000] += panned[:, :N - i]
    grit = puffs(at, amp(db - 11.0), decay_s=0.0036, rise_s=0.00021)
    grit += puffs(at, amp(db - 27.5), decay_s=0.025)
    tick = puffs(at, amp(tick_db - 4.0), decay_s=0.0052, rise_s=0.00064)
    tick += puffs(at, amp(tick_db - 29.5), decay_s=0.057)
    out += wide_noise(GRIND_COLOUR) * grit + wide_noise(HISS_COLOUR) * tick
    return out + ports(strike(at, amp(tick_db - 12), CHISEL_MODES, 3.0, .002))


def scrapes():
    """The chisel tip drags on grit: rough noise of uneven level, ringing in the stone."""
    # drags: start t/s, length/s, low level/dB, high level/dB
    drags = [(2.499, 0.054, -36, -51), (4.066, 0.14, -57, -68), (4.179, 0.091, -42, -64),
             (4.255, 0.051, -58, -58), (6.467, 0.108, -54, -58), (6.573, 0.082, -56, -48.5),
             (7.448, 0.045, -28, -73)]
    # modes of the stone: f/Hz, relative level/dB, t60/s
    stone_modes = [(1570, 18, 0.0036), (2360, 15.5, 0.0081), (2880, -9, 0.0067), (3670, -24, .008),
                   (4600, -13, 0.019)]
    low, high, t = np.zeros(N), np.zeros(N), np.arange(N) / SR
    for s, length, low_db, high_db in drags:
        shape = np.clip(np.minimum(t - s, s + length - t) / 0.017, 0, 1)
        low += shape * amp(low_db)
        high += shape * amp(high_db)
    grit = rng.standard_normal((2, N))
    stone = sum(amp(db) * ring(grit, hz, t60) for hz, db, t60 in stone_modes)
    return amp(1.5 * drift(250)) * (low * rms_one(stone) + high * wide_noise(HISS_COLOUR))


def scene():
    """The garden floor, the hammer and all that its chisel touches."""
    return garden() + trigger() + hammer() + clangs() + knocks() + scrapes()


def record(dry):
    """Peaks are rounded, the top is cut."""
    top, cutoff_hz = .86, 15750
    steep = signal.cheby2(16, 90, cutoff_hz, fs=SR, output="sos")      # 90 dB down from the cutoff on
    return signal.sosfilt(steep, top * np.tanh(dry / top))


dry = scene()
out = record(dry)
transcribe(out)
```